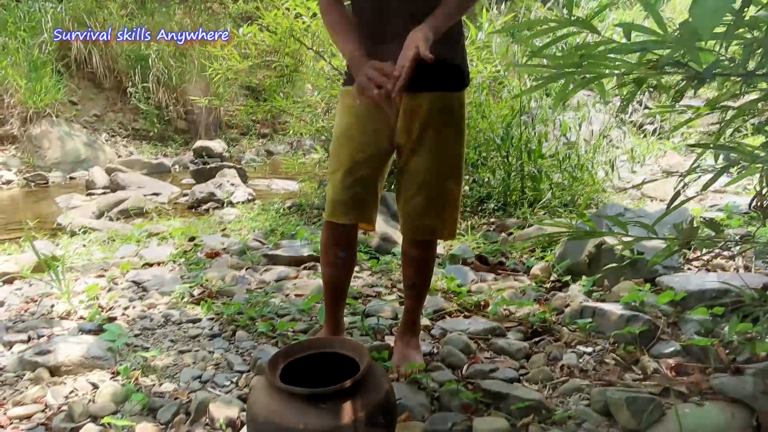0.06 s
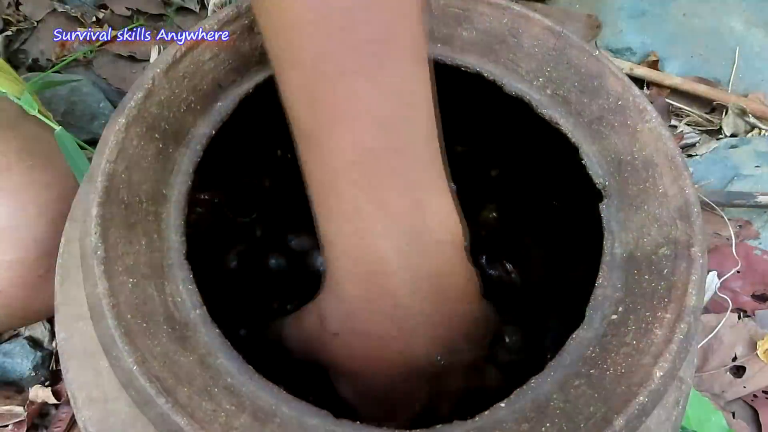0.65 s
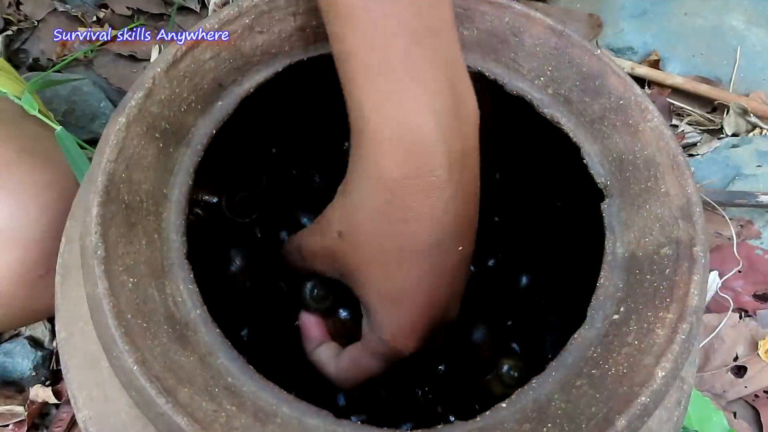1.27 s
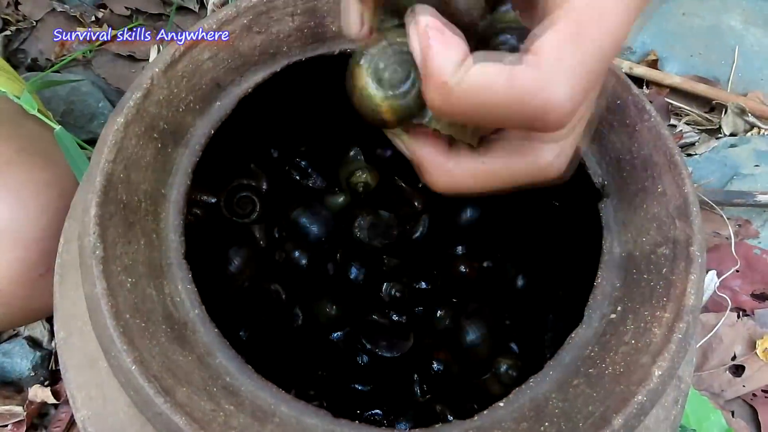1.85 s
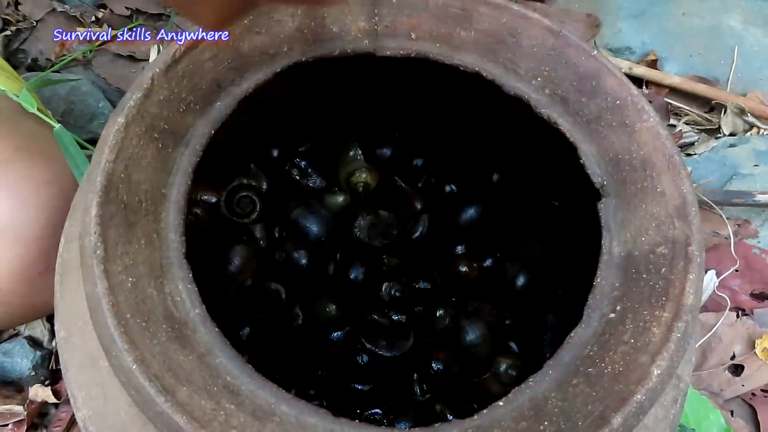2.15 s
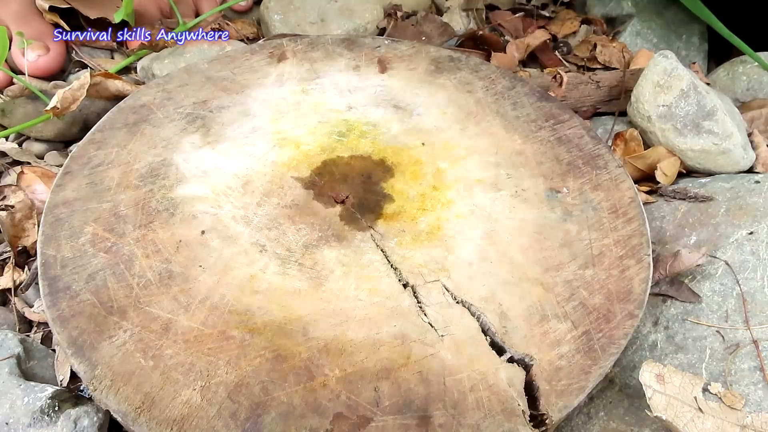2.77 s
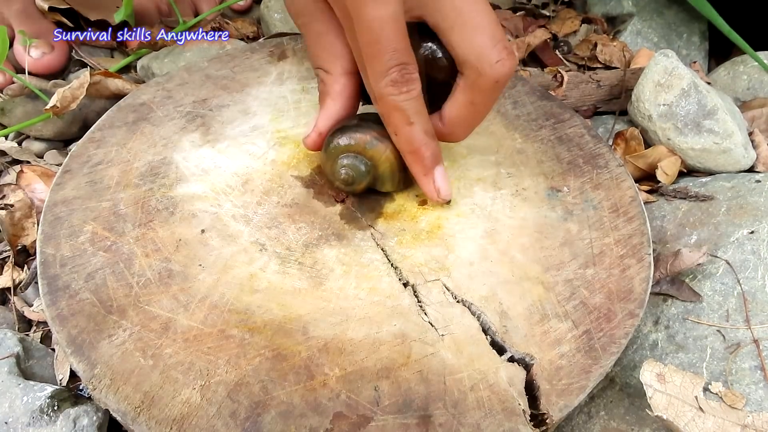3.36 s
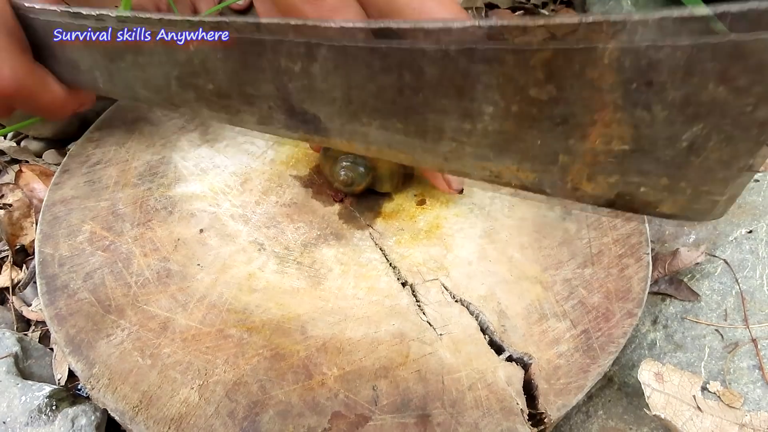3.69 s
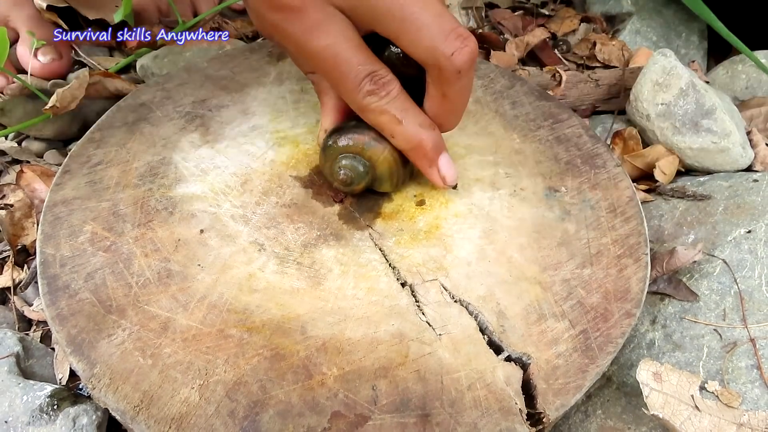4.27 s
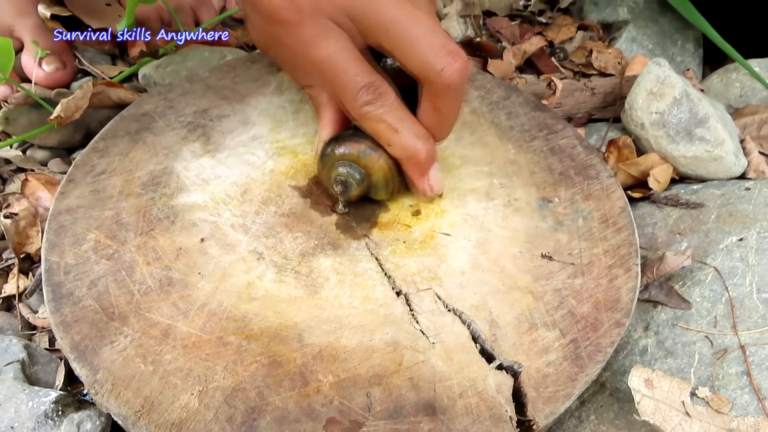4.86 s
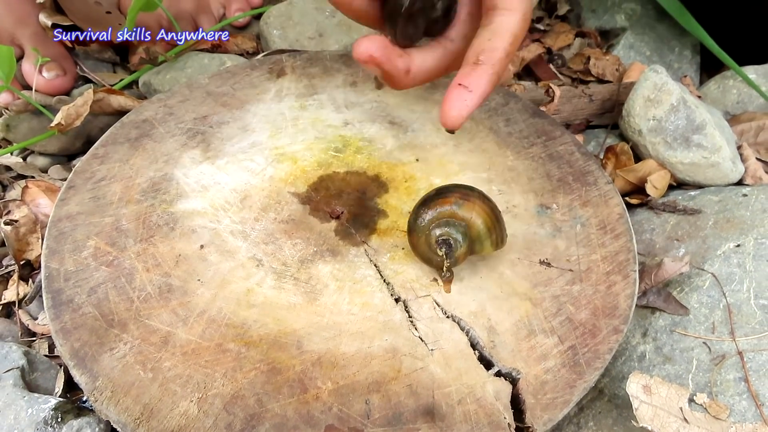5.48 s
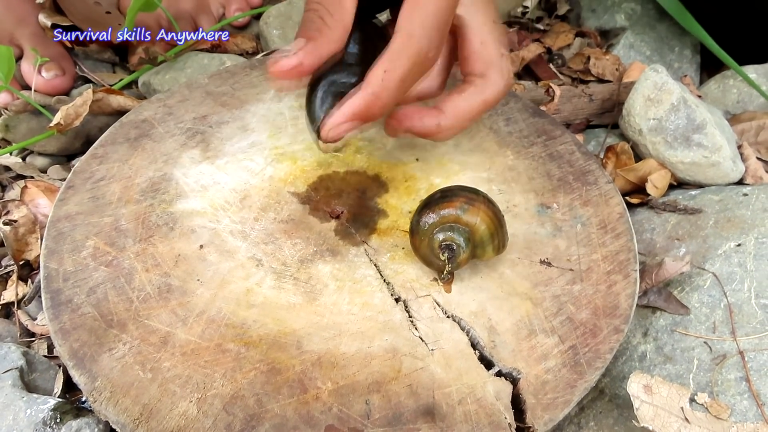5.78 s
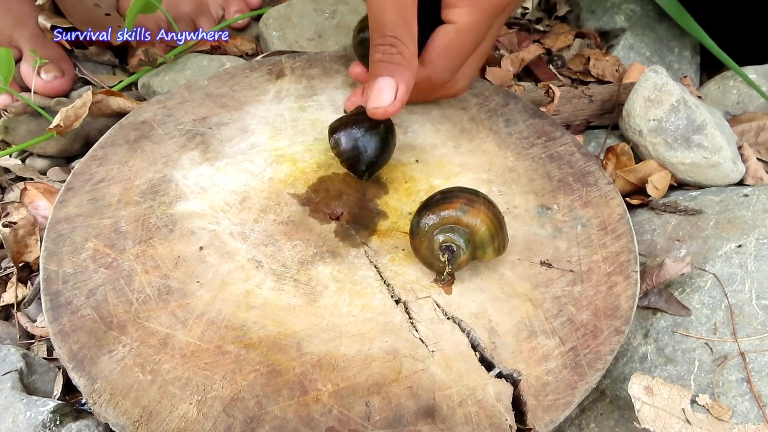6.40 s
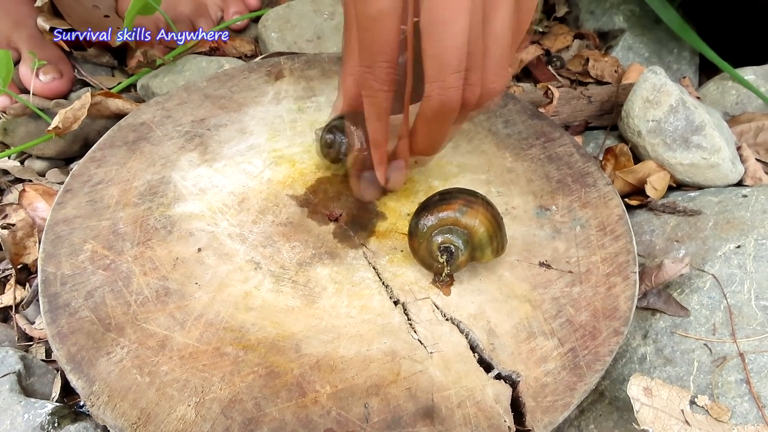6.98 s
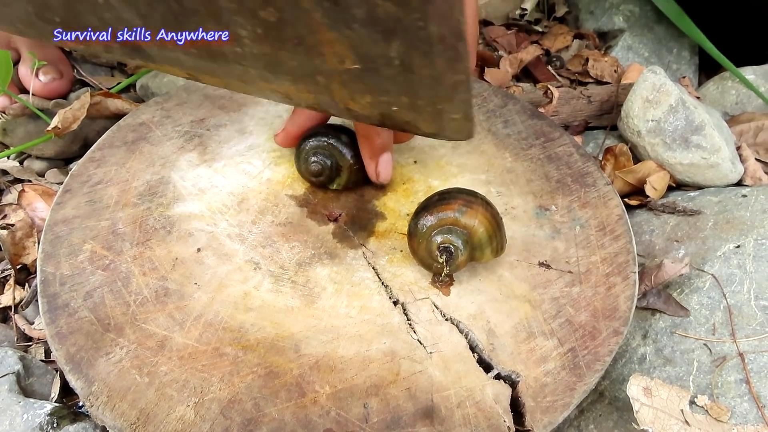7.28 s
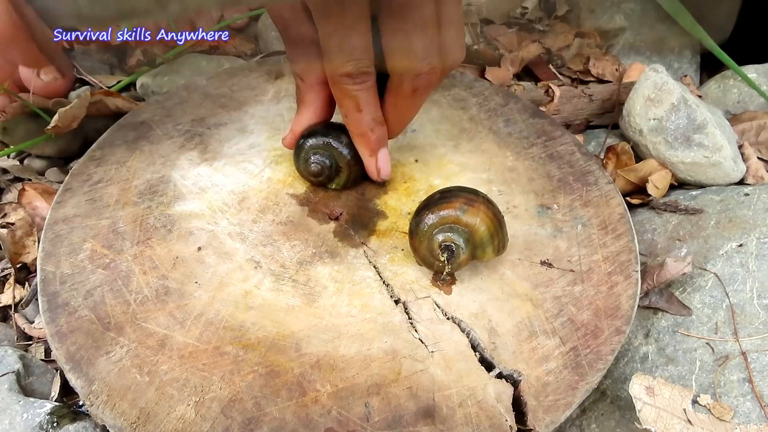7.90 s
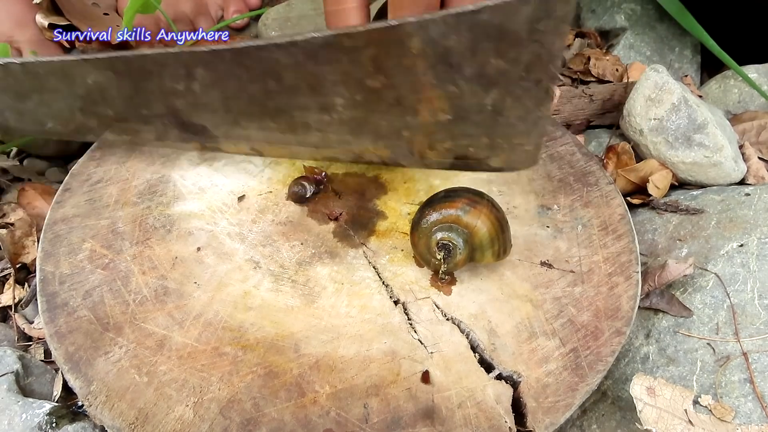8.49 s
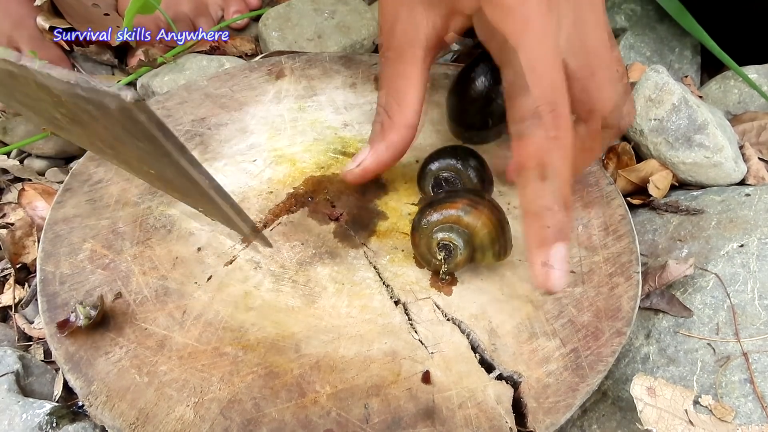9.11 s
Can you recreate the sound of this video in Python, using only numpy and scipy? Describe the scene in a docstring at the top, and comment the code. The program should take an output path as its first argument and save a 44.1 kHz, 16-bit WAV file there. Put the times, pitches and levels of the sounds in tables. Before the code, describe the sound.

Beside a faint stream, a hand stirs clacking shells in a hollow pot before two sharp cleaver chops crack shells against wood.

```python
"""Beside a softly rushing stream, something low throbs far off, like an engine.
A hand stirs snail shells in a clay pot: they grind and clack, and the pot's air booms.
Shells knock onto a wooden block; a cleaver taps for aim, then cracks through one into the wood.
Fingers shift the shells, and faint chirps carry over the water.
The cleaver chops again, slides back with a thin ring and is laid down."""
import sys
import numpy as np
from scipy import signal
from scipy.fft import rfft, irfft, next_fast_len
from scipy.io import wavfile
from scipy.ndimage import uniform_filter1d, map_coordinates

SR = 44100
rng = np.random.default_rng(int(sys.argv[2]) if len(sys.argv) > 2 else 0)


def master_out(mix):
    """Clip the mix to full scale and print it as 16-bit PCM to the path in sys.argv[1]."""
    frames = np.transpose(np.atleast_2d(mix))
    ceiling = np.clip(frames, -1, 1)
    pcm = np.round(ceiling * 32767).astype(np.int16)
    wavfile.write(sys.argv[1], SR, pcm)


N = 407925
TIME = np.arange(N) / SR
AGE = np.arange(SR // 4) / SR  # s since an impact
TOP_HZ = 15850


def amp(db):
    """Decibels to gain."""
    return 10 ** (np.asarray(db) / 20)


def unit(x):
    """Scale to rms 1."""
    return x / np.sqrt(np.mean(x ** 2) + 1e-20)


def peaked(x):
    """Scale to peak 1."""
    return x / (np.abs(x).max() + 1e-20)


def along(points, hz):
    """Interpolate (freq_hz, value) points on a log axis."""
    freqs, values = np.transpose(points)
    return np.interp(np.log(hz + 1), np.log(freqs + 1), values)


def curves(rows):
    """One value per sample for each column after the time."""
    times, *columns = np.transpose(rows)
    return [np.interp(TIME, times, column) for column in columns]


def wobble(knots_per_s):
    """Smooth random curve."""
    return map_coordinates(rng.standard_normal(int(N * knots_per_s / SR) + 4), [TIME * knots_per_s])


def swell(start_s, length_s, attack_s=.069, release_s=.051):
    """Gain that rises, holds and falls; attack and release each span 20 dB."""
    early, late = np.maximum(start_s - TIME, 0), np.maximum(TIME - start_s - length_s, 0)
    return amp(-20 * (early / attack_s + late / release_s))


def scattered(start_s, end_s, per_s):
    """Loosely spaced events: rows of time_s and two normal draws."""
    draws = np.random.default_rng(rng.integers(1 << 30)).standard_normal((int((end_s - start_s) * per_s), 3))
    slots = np.arange(len(draws)) + .5 + .5 * np.tanh(draws[:, 0])
    return np.column_stack([start_s + slots / per_s, draws[:, 1:]])


def add(track, start_s, x):
    """Mix x into the track."""
    part = track[max(round(start_s * SR), 0):][:len(x)]
    part += x[:len(part)]


def filtered(x, response):
    """Apply a complex frequency response."""
    n = x.shape[-1]
    size = next_fast_len(n + 8192, True)
    return irfft(rfft(x, size) * response(np.fft.rfftfreq(size, 1 / SR)), size)[..., :n]


def coloured(x, spectrum, size=2048):
    """Minimum-phase filter from (freq_hz, gain_db) points."""
    cepstrum = irfft(np.log(amp(along(spectrum, np.fft.rfftfreq(size, 1 / SR))) + 1e-6))
    cepstrum[1:size // 2] *= 2
    cepstrum[size // 2 + 1:] = 0
    return signal.fftconvolve(x, irfft(np.exp(rfft(cepstrum))))[:len(x)]


def cut(x, hz, kind):
    """Second-order low- or high-pass."""
    return signal.sosfilt(signal.butter(2, np.clip(hz, 10, .45 * SR), kind, fs=SR, output="sos"), x)


def band(x, low_hz, high_hz):
    """High-pass, then low-pass."""
    return cut(cut(x, low_hz, "high"), high_hz, "low")


def burst(t60_s):
    """Decaying noise."""
    return rng.standard_normal(len(AGE)) * amp(-60 * AGE / t60_s)


def ring(modes, scatter_db=0, detune=0):
    """Struck modes, with optional scatter in level and pitch."""
    return sum(amp(db + scatter_db * rng.normal() - 60 * AGE / t60_s)
               * np.sin(2 * np.pi * hz * (1 + detune * rng.normal()) * AGE) for hz, db, t60_s in modes)


def sparks(per_s, spread_db, count=N):
    """Random tiny impacts."""
    impulses = (rng.random(count) < per_s / SR) * rng.choice([-1, 1], count)
    return impulses * amp(spread_db * rng.standard_normal(count))


def ports(x, lag_samples):
    """A near source reaches two microphone ports at different times."""
    return filtered(x, lambda hz: np.exp(np.outer([1, -1], 1j * np.pi * hz * lag_samples / SR)))


# left-right likeness of the ambience: freq_hz, correlation
COHERENCE = [(60, 1.0), (180, 0.61), (550, 0.61), (1650, 0.83), (4970, 0.48), (15000, 0.15)]

def rush(spectrum, patchy_db):
    """Stereo noise of rms 1 with patches of random gain."""
    bins = signal.stft(rng.standard_normal((2, N)), nperseg=512)[2]
    patches = uniform_filter1d(rng.standard_normal(bins.shape[1:]), size=5, axis=0)
    patches = unit(uniform_filter1d(patches, size=10, axis=1))
    pair = signal.istft(bins * amp(patchy_db * patches), nperseg=512)[1][:, :N]

    def mid_side(hz):
        angle = np.arccos(np.clip(along(COHERENCE, hz), -1, 1)) / 2
        return amp(along(spectrum, hz)) * [np.cos(angle), np.sin(angle)]

    mid, side = filtered(pair, mid_side)
    return unit(np.array([mid + side, mid - side]))


# far drone: time_s, pitch_hz, relative_db
DRONE = [(0, 68, -52), (1, 65, -58), (2.8, 71.4, -49), (3.45, 89, -50), (4.05, 73, -52.5),
         (4.45, 71.5, -50.5), (4.82, 68, -64.5), (5.2, 63.5, -56), (7.2, 71.5, -52), (8.3, 73, -54),
         (9.25, 62.5, -54.5)]
# its throb: time_s, beat_hz, depth_ratio
DRONE_BEATS = [(0, 4.53, .65), (2.5, 5.75, .75), (2.7, 9, .33)]

def hum():
    """Two close low tones beat over a faint rumble."""
    pitch_hz, relative_db = curves(DRONE)
    beat_hz, depth = curves(DRONE_BEATS)
    phase = 2 * np.pi * np.cumsum(pitch_hz + .6 * wobble(12)) / SR
    beat_phase = 2 * np.pi * np.cumsum(beat_hz) / SR
    drone = unit(np.sin(phase) + depth * np.sin(phase - beat_phase))
    rumble = rush([(10, -17.5), (30, -4.5), (80, 3.5), (130, -7.5), (250, -34), (600, -94)], patchy_db=3)
    rumble = rumble.mean(axis=0) + .2 * rumble  # long waves reach both ports alike
    return amp(relative_db - 2.5) * drone + amp(-60.5) * rumble


def bubble(hz):
    """A bubble rings up, fades and rises slightly in pitch."""
    life = AGE * hz / 5
    return life * np.exp(1 - life) * np.sin(2 * np.pi * hz * AGE * (1 + .01 * np.minimum(life, 6)))


# water's hiss: freq_hz, gain_db
HISS_SPECTRUM = [(530, -27.5), (900, -3), (1180, -5.5), (1720, -3.5), (2750, -7), (3210, -7), (4110, -11),
                 (6280, -14.5), (7230, -18.5), (11000, -25), (15000, -31)]
# water's low rush: freq_hz, gain_db
LOW_RUSH_SPECTRUM = [(71, -32.5), (120, -12), (194, -6), (231, -9.5), (275, -7.5), (400, -8.5),
                     (1200, -19.5), (1560, -36.5), (2640, -120)]
# loudest bubbles: start_s, pitch_hz, relative_db
STREAM_GULPS = [(1.575, 603, -52.5), (3.029, 472, -53), (5.911, 395, -48.5), (8.849, 380, -47),
                (9.01, 615, -52.5)]

def stream():
    """Shallow water: surging hiss over a low rush, with small bubbles and a few gulps."""
    bubbles = np.zeros(N)
    for when, pitch, size in rng.random(size=(170, 3)):
        add(bubbles, when * N / SR, amp(-70 + 11 * size ** 4 - 7 * pitch) * bubble(300 * 4 ** (pitch ** 1.5)))
    for start_s, hz, db in STREAM_GULPS:
        add(bubbles, start_s, amp(db - 3.5) * bubble(hz))
    hiss = rush(HISS_SPECTRUM, patchy_db=.6) * amp(-67 + wobble(3.3))
    return hiss + amp(-63) * rush(LOW_RUSH_SPECTRUM, patchy_db=2.5) + bubbles


def chirps():
    """Thin rising notes, blurred by distance; the bout sinks and fades."""
    start_s, end_s, sag_hz_per_s, fade_db_per_s = 6.0, 7.7, 250, 1.5
    notes = [(6.09, 3230, -61)]  # one clear chirp: centre_s, pitch_hz, level_db
    for centre_s, force, pitch in scattered(start_s, end_s, per_s=13):
        elapsed_s = centre_s - start_s
        hz = (2850 - sag_hz_per_s * elapsed_s) * np.exp(.15 * pitch)
        notes.append((centre_s, hz, -68.5 - fade_db_per_s * elapsed_s + 2 * force))
    out = np.zeros(N)
    blur, length_s = wobble(390), .0584
    for centre_s, hz, db in notes:
        offset = (TIME - centre_s) / length_s
        phase = 2 * np.pi * np.cumsum(hz * (1 + .04 * np.clip(offset, -1, 1))) / SR
        out += amp(db) * blur * np.exp(-4 * offset ** 2) * np.sin(phase)
    return out


# riverside echo: freq_hz, t60_s
BANK_DECAY = [(200, .3), (2000, .4), (5000, .35), (14000, .2)]

def banks(x):
    """Stones and bushes return a diffuse tail."""
    hz, age_s, bins = signal.stft(rng.standard_normal((2, SR // 2)), SR, nperseg=256)
    decay = amp(-60 * age_s / along(BANK_DECAY, hz)[:, None])
    mid, side = signal.istft(bins * decay, SR, nperseg=256)[1]
    tail = mid + .35 * np.outer([1, -1], side)
    return signal.fftconvolve(cut(x, 1400, "high")[None], tail / np.linalg.norm(tail[0]), axes=1)[:, :N]


def rustle():
    """A faint dry rustle and one crisp tick before the stirring."""
    grit = unit(band(sparks(per_s=3000, spread_db=3), 2900, 5500))
    out = amp(-71) * swell(.05, .16, attack_s=.25, release_s=.15) * grit
    add(out, .084, amp(-47.5) * peaked(cut(burst(.02), 3500, "high")))
    return out


def shell(hz, t60_s):
    """A small shell rings in four modes scattered about hz."""
    age_s = AGE[:SR // 32]
    modes_hz = np.minimum(hz * np.exp(.351 * rng.standard_normal((4, 1))), TOP_HZ)
    modes = np.sin(2 * np.pi * modes_hz * age_s) * rng.standard_normal((4, 1))
    return peaked(modes.sum(axis=0) * amp(-60 * age_s / t60_s))


def in_pot(x, cavity):
    """A contact plus the ring it excites in the pot's air."""
    return x + amp(-34) * signal.fftconvolve(x, cavity)[:len(x)]


# shell against shell: freq_hz, gain_db
RATTLE_SPECTRUM = [(240, -29.5), (400, -3.5), (663, -13.5), (942, -10.5), (1080, -6.5), (1240, 2.5),
                   (1590, 1), (3060, -5), (4770, -9), (6680, -25), (7910, -23), (12900, -34), (15500, -50)]

def grinding(cavity):
    """Many light touches over the grit of wet shells rubbing."""
    start_s, length_s = .3, 1.3
    stirring = (TIME > start_s) & (TIME < start_s + length_s)
    touches = np.zeros(N)
    for when, pitch, size in rng.random(size=(2000, 3)):
        touch = amp(13 * size ** 3) * shell(1000 + 12000 * pitch, t60_s=.014)
        add(touches, start_s + length_s * when, touch)
    grit = unit(sparks(per_s=4500, spread_db=7))
    grind = in_pot(coloured(.75 * grit + touches / np.std(touches[stirring]), RATTLE_SPECTRUM), cavity)
    return grind / np.std(grind[stirring])


RUMMAGE_START_S, RUMMAGE_LENGTH_S = .39, .84
# hardest clacks in the pot: start_s, relative_db, centre_hz
HARD_CLACKS = [(.068, -39, 1720), (.462, -18.5, 1750), (.472, -16, 1900), (0.553, -22, 1400),
               (0.561, -16.5, 2650), (.625, -35, 5170), (.689, -18.5, 4500), (.741, -19.5, 3050),
               (0.778, -18.5, 2140), (.792, -22.5, 1590), (.889, -30.5, 4960), (.921, -27, 2600),
               (1.001, -18.5, 1900), (1.038, -20.5, 4770), (1.074, -12.5, 3930), (1.118, -13, 1700),
               (1.219, -27, 3420), (1.289, -27, 1110), (1.305, -25.5, 1560), (1.334, -13, 1770),
               (1.361, -29, 1700), (1.376, -21, 1840), (1.391, -27.5, 3010), (1.419, -12, 1850),
               (1.435, -27, 3500), (1.476, -33.5, 1090), (1.513, -13.5, 1200), (1.679, -31.5, 1790)]

def clacks(cavity, rattle_gain):
    """Shells graze, then clack with a hollow note and echoes off the clay wall."""
    moments = scattered(RUMMAGE_START_S, RUMMAGE_START_S + RUMMAGE_LENGTH_S, per_s=30)
    # harder pushes jostle the neighbours harder
    jostles = [(s, 20 * np.log10(rattle_gain[int(s * SR)]) + 11 + 3 * force, 2920 * np.exp(.35 * pitch))
               for s, force, pitch in moments]
    out = np.zeros(N)
    for start_s, db, hz in HARD_CLACKS + jostles:
        echoes = (burst(.028) + .11 * burst(.1)) * (1 - np.exp(-AGE / .0013))
        contact = unit(cut(coloured(echoes, RATTLE_SPECTRUM), .5 * hz, "high"))
        note = unit(band(band(burst(.034), hz, hz), hz, hz))
        clack = amp(db - 29) * unit(cut(in_pot(contact + 1.1 * note, cavity), 710, "high"))
        graze = amp(-22) * np.std(clack) * unit(coloured(burst(.04), RATTLE_SPECTRUM))
        add(out, start_s, clack)
        add(out, start_s - .008, graze)
    return out


# air in the pot: pitch_hz, relative_db, t60_s
POT_MODES = [(264.5, -24, 0.12), (807, -12, 0.16), (1104, 3.5, 0.033), (1514, -21, 0.063),
             (1684, -13.5, 0.043), (2200, -16.5, 0.032), (3160, -13, 0.072), (3660, -10.5, 0.041),
             (4220, -12.5, 0.045)]
# hand's pushes, relative levels: start_s, length_s, rattle_db, boom_db
HAND_PUSHES = [(.358, 0.013, -41, -61), (.445, .04, -34, -40), (.69, 0.086, -35.5, -44),
               (.975, 0.034, -30.5, -39), (1.035, 0.096, -38, -54), (1.17, 0.073, -45.5, -50),
               (1.35, 0.094, -52.5, -47), (1.52, 0.022, -64, -47)]

def pot():
    """A hand pushes through the heap: wet shells grind, crackle and clack; the pot's air booms."""
    cavity = ring(POT_MODES)
    moves = HAND_PUSHES + [(RUMMAGE_START_S, RUMMAGE_LENGTH_S, -48.5, -54)]  # heap shifts between pushes
    powers = sum(np.outer(amp(levels_db), swell(start_s, length_s, attack_s=.033, release_s=.041)) ** 2
                 for start_s, length_s, *levels_db in moves)
    rattle_gain, boom_gain = np.sqrt(powers)
    out = amp(-1) * rattle_gain * grinding(cavity)
    crackle = unit(cut(sparks(per_s=1100, spread_db=5), 5600, "high") * amp(4.7 * wobble(60)))
    out += amp(-51.5) * (rattle_gain / amp(-33)) ** 1.3 * crackle  # grows faster than the rattle
    boom = signal.fftconvolve(sparks(per_s=1200, spread_db=2.5), ring(POT_MODES[:1], scatter_db=1))[:N]
    out += amp(-.5) * boom_gain * unit(cut(boom, 316, "high"))
    return out + clacks(cavity, rattle_gain)


# block's response to a blow: freq_hz, gain_db
WOOD_SPECTRUM = [(40, -41), (120, -29), (200, -24), (300, -10), (460, -9), (560, -4), (680, 5), (820, -2.5),
                 (1000, -4), (1250, -16), (1500, -18), (2000, -30), (3000, -42.5), (6000, -61),
                 (15000, -79.5)]

def knock():
    """A blow scatters in the thick block as a dull note; the ground returns a little."""
    blow = .03 * burst(.012) + amp(-46) * burst(.07)
    blow[0] = 1
    return peaked(cut(coloured(blow, WOOD_SPECTRUM), 150, "high"))


# steel blade: pitch_hz, relative_db, t60_s
BLADE_MODES = [(704, -1.5, 0.036), (1040, -3.5, .05), (1860, 1, .24), (2213, -2, 0.088), (2600, 0.5, 0.083),
               (3480, -1.5, .18), (4960, -8, 0.08), (5593, -1, .07), (7217, 0, 0.096), (8400, -1, 0.16),
               (13400, -12, .08)]

def blade():
    """The cleaver's ring, damped by the hand."""
    return peaked(ring(BLADE_MODES, scatter_db=1.5))


# touches on the block, relative levels: start_s, level_db, click_db, blade_ratio
BLOCK_TAPS = [(3.299, -31, -24, 0), (3.864, -28, -13, .1), (3.914, -36.5, -20, 0), (4.018, -41, -12, .08),
              (4.118, -32.5, -15, 0), (5.309, -45.5, -7, 0), (6.432, -37.5, -33, 0), (7.155, -39.5, -32, 0),
              (7.761, -37.5, 0, .1), (7.769, -28, -12, .03), (8.748, -11.5, -53, 0),
              (9.219, -39.5, -7.5, 0)]

def taps():
    """Shells, blade and handle knock on the wood with a hard click; the steel rings on some."""
    out = np.zeros(N)
    for start_s, db, click_db, blade_ratio in BLOCK_TAPS:
        click = amp(click_db + 6) * peaked(band(burst(.039), 980, 2948))
        tap = knock() + click + blade_ratio * peaked(cut(blade(), 4000, "high"))
        add(out, start_s, amp(db - .5) * tap)
    return out


# clearest shell ticks and flying chips: start_s, relative_db, centre_hz
SHELL_TICKS = [(4.6603, -54, 3100), (5.6068, -38, 2464), (5.7982, -47.5, 2466), (5.9404, -52.5, 3470),
               (7.9865, -54, 2883), (8.225, -48, 2950), (8.4146, -50, 4260), (8.5106, -46, 3730)]

def loose_shells():
    """Chips and touched shells tick with a hollow note; fingertips rub on the shells."""
    first_s, last_s = 4.9, 5.9
    fingering = [(start_s, -57.5 + 2 * force, 3050 * np.exp(.2 * pitch))
                 for start_s, force, pitch in scattered(first_s, last_s, per_s=9.7)]
    out = np.zeros(N)
    for start_s, db, hz in SHELL_TICKS + fingering:
        tick = peaked(band(burst(.021) + .12 * burst(.13), .5 * hz, 1.5 * hz))
        note = ring([(hz, -9.5, .028)], scatter_db=.5)
        add(out, start_s, amp(db + 3.5) * (tick + note))
    rub = unit(band(sparks(per_s=3000, spread_db=3), 2200, 4200))
    return out + amp(-77.5 + 3.5 * wobble(18)) * swell(first_s, last_s - first_s) * rub


# blade drawn back, then laid down: start_s, length_s, relative_db
BLADE_SLIDES = [(8.395, 0.051, -77.5), (8.842, .04, -59.5)]

def slides():
    """The blade scrapes over shell and wood; uneven friction keeps its modes shivering."""
    singing = sum(amp(db) * wobble(90) * np.sin(2 * np.pi * hz * TIME + wobble(130))
                  for hz, db, _ in BLADE_MODES)
    grit = sparks(per_s=1800, spread_db=0)
    scrape = 1.3 * unit(coloured(grit, CRUNCH_SPECTRUM)) + unit(coloured(grit, WOOD_SPECTRUM))
    gain = sum(amp(db) * swell(start_s, length_s) for start_s, length_s, db in BLADE_SLIDES)
    return gain * (1.25 * singing + 1.3 * scrape)


def crack():
    """Hard snap of the edge meeting shell or wood."""
    snap = ring([(900, -2.5, .0038), (1300, -7.5, .0055)], scatter_db=1, detune=.01)
    return peaked(band(snap, 600, 4600))


# breaking shell: freq_hz, gain_db
CRUNCH_SPECTRUM = [(300, -23), (600, -3), (1050, 4.5), (2000, -10), (3700, -5.5), (4800, -14), (8300, -9.5),
                   (12500, -17), (15500, -22)]
# edge entering wood: freq_hz, gain_db
BITE_SPECTRUM = [(400, -26), (900, -4.5), (1500, -1), (2100, -7.5), (3800, -12), (5500, -26), (15000, -41)]
# cleaver strokes: shell_s, wood_s, crack_db, crunch_db, block_db, rebound_db
CLEAVER_CHOPS = [(4.4470, 4.4500, -7.5, -20, -.5, -23), (8.1179, 8.1265, -1, -14.5, -4, -36.5)]

def chops():
    """The edge cracks the shell, crunches through, lands in the wood and rebounds."""
    out = np.zeros(N)
    for shell_s, wood_s, crack_db, crunch_db, block_db, rebound_db in CLEAVER_CHOPS:
        splinters = unit(coloured(sparks(per_s=20000, spread_db=1, count=len(AGE)), CRUNCH_SPECTRUM))
        landed_s = np.maximum(AGE - (wood_s - shell_s), 0)
        decay = amp(-60 * landed_s / .013) + amp(-22 - 60 * landed_s / .13)
        add(out, shell_s, amp(crunch_db) * splinters * decay)
        add(out, shell_s, amp(crack_db) * crack())
        # the edge bites the fibres; stony ground scatters the blow back
        bite = unit(coloured(burst(.025) + .042 * burst(.16), BITE_SPECTRUM))
        thud = peaked(cut(knock(), 330, "high"))
        add(out, wood_s, amp(block_db) * (thud + amp(-3) * crack() + amp(-26.5) * bite))
        add(out, wood_s, amp(crunch_db - 12) * blade())
        add(out, wood_s + .022, amp(rebound_db) * knock())
    return out


def scene():
    """Near work at pot and block, its faint echo and the riverside."""
    at_pot = pot() + rustle()
    at_block = chops() + taps() + loose_shells() + slides()
    near = ports(at_pot, lag_samples=.15) + ports(at_block, lag_samples=.8)
    return near + amp(-31.5) * banks(at_pot + at_block) + stream() + chirps() + hum()


def record(dry):
    """Overloads clip and duck the gain, which recovers; the band ends at TOP_HZ."""
    depth_db, recover_s = 3, .28
    last_overload_s = np.maximum.accumulate(np.where(np.abs(dry).max(axis=0) > 1, TIME, -np.inf))
    duck_db = cut(depth_db * np.exp((last_overload_s - TIME) / recover_s), 8.8, "low")
    ducked = np.clip(dry, -1, 1) * amp(-duck_db)
    return filtered(ducked, lambda hz: .5 - .5 * np.tanh((hz - TOP_HZ) / 150))


dry = scene()
out = record(dry)
master_out(out)
```